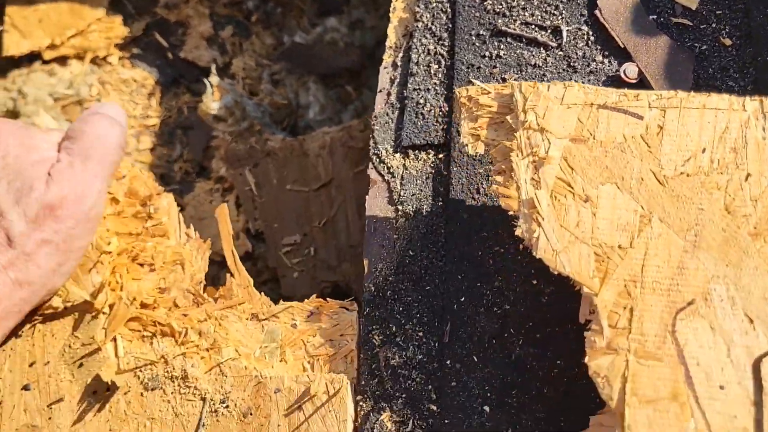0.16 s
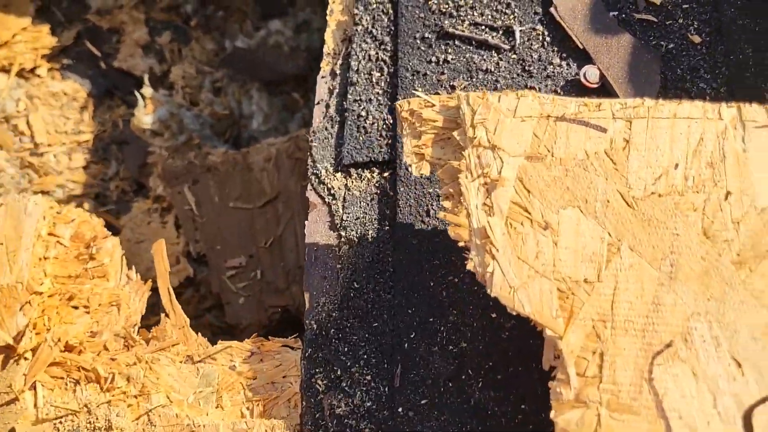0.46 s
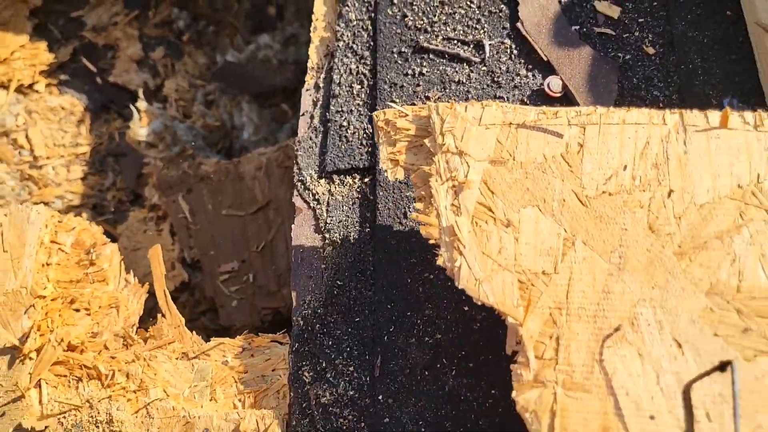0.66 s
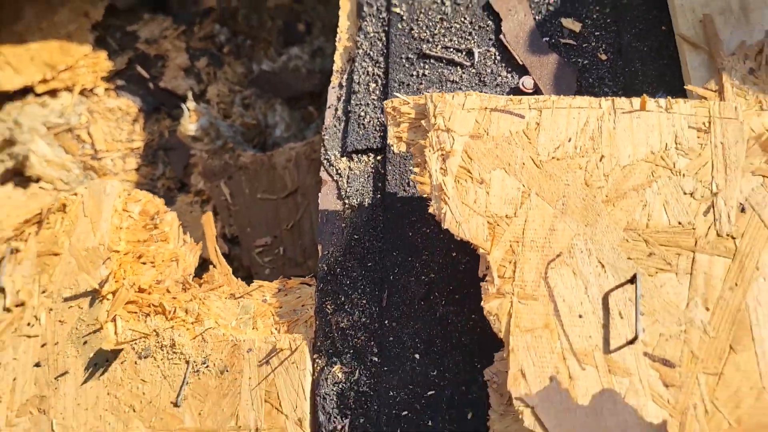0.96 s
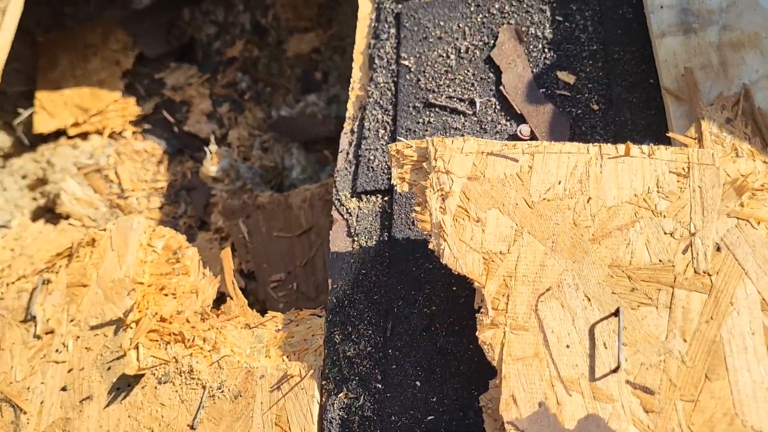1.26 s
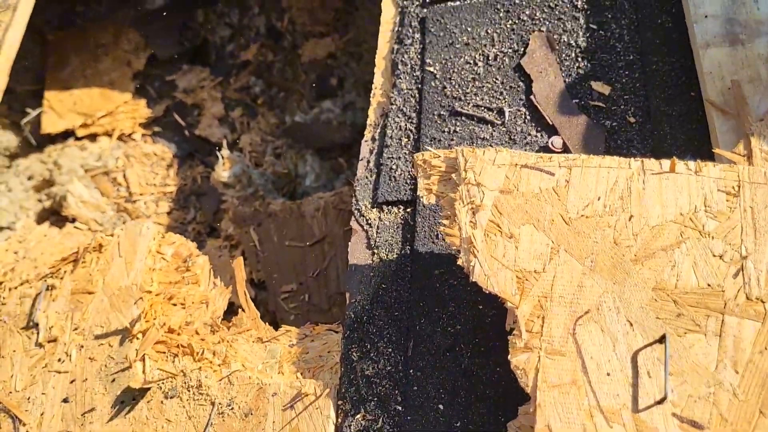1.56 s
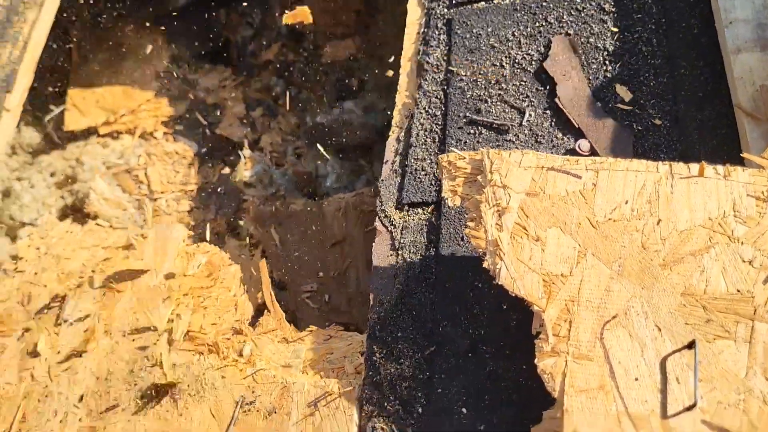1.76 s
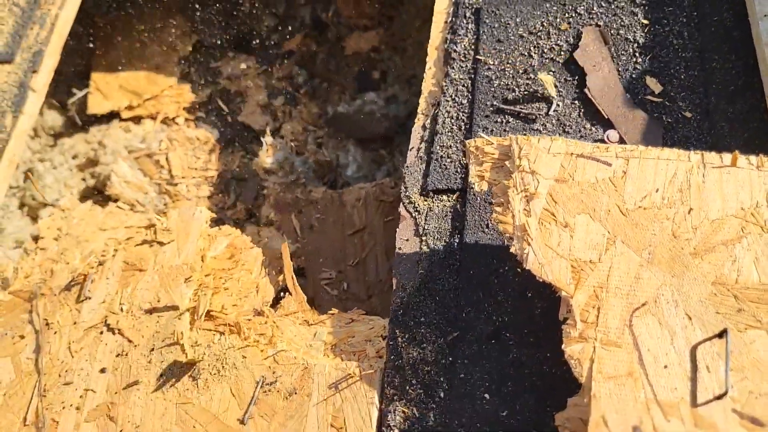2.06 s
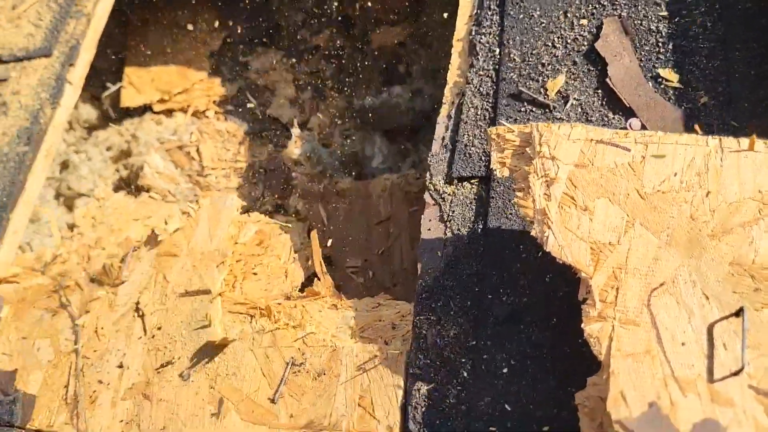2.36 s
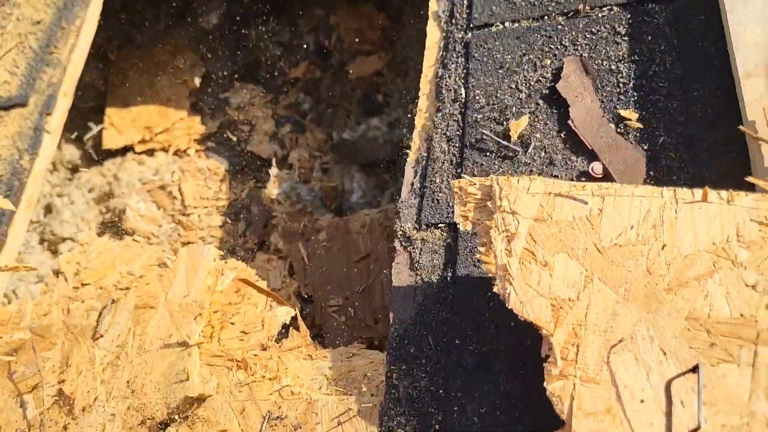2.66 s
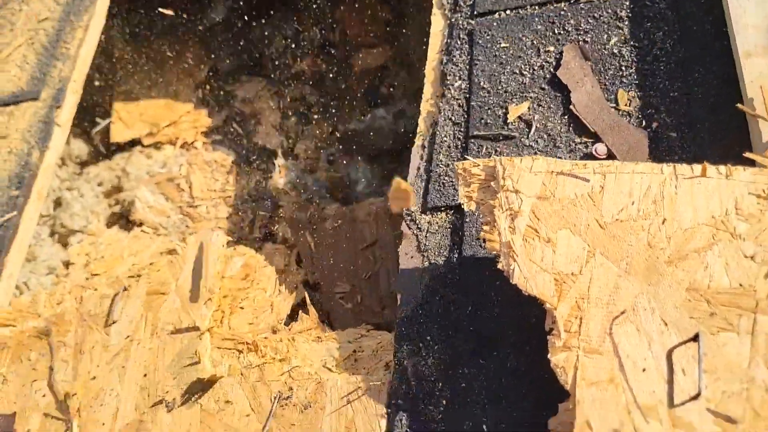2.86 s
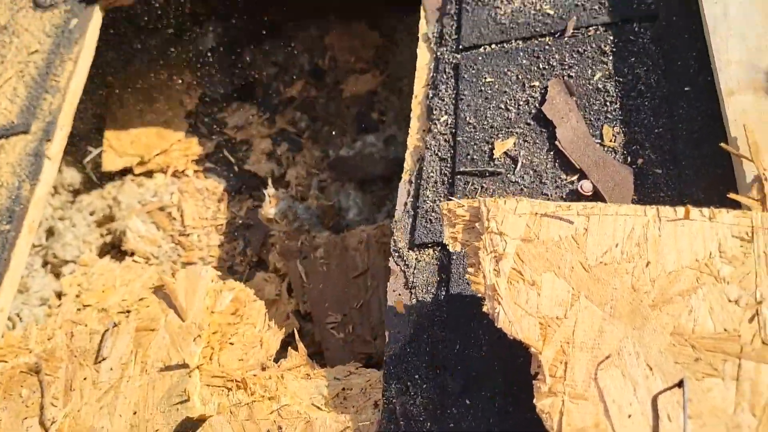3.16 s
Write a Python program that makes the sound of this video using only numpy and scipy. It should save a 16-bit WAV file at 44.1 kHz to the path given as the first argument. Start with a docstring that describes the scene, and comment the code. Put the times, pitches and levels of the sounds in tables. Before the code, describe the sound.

Close stereo pickup outdoors on a roof: splintering board fibres crackle and snap over soft low thumps and wind, then four hard, evenly spaced hammer knocks ring the hollow deck, chips pattering after.

```python
"""A hammer lands four times on a strand-board roof deck: short crack, low flex, bounces, a patter of chips.
Before it a cut piece of board is pried loose: it crunches (grains), snaps (short rings) and thuds (low pushes).
The blows are noise bursts ringing board modes, with a swelling low wave.
Wind mutters at two microphone ports over a thin outdoor hiss; both are coloured noise."""
import sys
import numpy as np
from scipy import signal
from scipy.fft import rfft, irfft
from scipy.io import wavfile
from scipy.ndimage import uniform_filter1d

SR = 44100
rng = np.random.default_rng(int(sys.argv[2]) if len(sys.argv) > 2 else 0)


def put_to_file(sound):
    """Save the sound as 16-bit audio at rate SR, in the file named by the first command-line argument."""
    columns = np.atleast_2d(sound).T  # one column per channel
    safe = np.clip(columns, -1, 1)
    whole_steps = np.round(safe * 32767)
    wavfile.write(sys.argv[1], SR, whole_steps.astype(np.int16))


def magnitude_from_level(level_db):
    """Linear magnitude for a level in decibels (20 dB per decade)."""
    exponent = np.asarray(level_db, float) / 20
    return 10 ** exponent


N = 145530
LEFT_DB, LAG_SAMPLES = -1.0, 8  # right port: opposite gain, usual lag

# hammer blows: full_contact_s, crack_db, flex_db, right_lag_samples
BLOWS = [(1.6328, 3, -3, 10), (2.1164, 4, -4.5, 10), (2.665, 3, -4.5, 10.5), (3.274, 3.5, -3.5, -7.5)]


def evened(x):
    """Scale to rms 1."""
    return x / np.sqrt(np.mean(x ** 2) + 1e-20)


def spectrum_db(points, hz):
    """Gain table read on a log-frequency axis."""
    f, gain_db = np.transpose(points)
    return np.interp(np.log(hz + 1), np.log(f + 1), gain_db, left=-90, right=-90)


def level_curve(rows):
    """Amplitude over time from (s, dB) points, straight lines in dB."""
    time_s, level_db = np.transpose(rows)
    return magnitude_from_level(np.interp(np.arange(N) / SR, time_s, level_db))


def coloured(x, points):
    """Causal (minimum-phase) filter with the given spectrum."""
    hz = abs(np.fft.fftfreq(8192, 1 / SR))
    log_gain = np.log(magnitude_from_level(spectrum_db(points, hz)))
    min_phase = signal.hilbert(log_gain).imag
    taps = np.fft.ifft(np.exp(log_gain - 1j * min_phase)).real[:4096]
    return signal.oaconvolve(x, taps[None], axes=1)[:, :x.shape[1]]


def dying_sine(hz, t60_s, t):
    """One decaying mode."""
    return magnitude_from_level(-60 * t / t60_s) * np.sin(2 * np.pi * hz * t)


def ring(modes, t, detune=1):
    """Sum of decaying modes (Hz, dB, t60 s), each frequency times its detune."""
    ratios = detune * np.ones(len(modes))
    return sum(magnitude_from_level(db) * dying_sine(hz * d, t60_s, t) for (hz, db, t60_s), d in zip(modes, ratios))


def butter(x, order, hz, kind):
    """Butterworth filter."""
    return signal.lfilter(*signal.butter(order, hz, kind, fs=SR), x)


def add(mix, start_s, sound, lag_samples):
    """Place a sound at both ports; nearby edges scatter the treble differently to each."""
    scatter_hz, scatter_t60_s, scatter_db = 2750, 0.003, -7.0
    cycles_per_sample, t = np.fft.rfftfreq(len(sound)), np.arange(512) / SR
    edges = rng.standard_normal((2, len(t))) * magnitude_from_level(-60 * t / scatter_t60_s)
    edges = butter(edges, 1, scatter_hz, "high")
    edges /= np.linalg.norm(edges, axis=1, keepdims=True)
    paths = 1 + magnitude_from_level(scatter_db) * rfft(edges, len(sound))
    paths[0] *= magnitude_from_level(LEFT_DB)
    paths[1] *= np.exp(-2j * np.pi * cycles_per_sample * lag_samples) / magnitude_from_level(LEFT_DB)
    for ch, v in enumerate(irfft(rfft(sound) * paths, len(sound))):
        part = mix[ch, max(round(start_s * SR), 0):][:len(v)]
        part += v[:len(part)]


def noise_pair(correlation):
    """Two noises with a given correlation."""
    a, b = rng.standard_normal((2, N))
    return np.array([a, correlation * a + np.sqrt(1 - correlation ** 2) * b])


def grains(per_s, spread_db):
    """Random clicks of very uneven size from four places around the two ports."""
    lags = (LAG_SAMPLES, LAG_SAMPLES // 2, -LAG_SAMPLES // 2, LAG_SAMPLES + 3)
    size = magnitude_from_level(spread_db * np.minimum(rng.exponential(1, (4, N)), 5))
    size *= rng.choice([-1, 1], (4, N))
    size *= rng.random((4, N)) < per_s / SR / 4
    right = sum(np.roll(v, lag) for v, lag in zip(size, lags))
    return np.array([magnitude_from_level(LEFT_DB) * size.sum(0), right / magnitude_from_level(LEFT_DB)])


def fibres(per_s, spread_db, lo_hz, hi_hz, clumps=1):
    """Grains of ten fibre sizes: a wide tick plus a few cycles at the fibre's own pitch."""
    t, out = np.arange(512) / SR, 0
    for hz in np.geomspace(lo_hz, hi_hz, 10):
        tone = dying_sine(hz, 6 / hz, t)  # 60 dB down in 6 cycles
        grain = tone / np.linalg.norm(tone) + 0.5 * (t == 0)
        clicks = clumps * grains(per_s / 10, spread_db)
        out = out + signal.oaconvolve(clicks, grain[None], axes=1)[:, :N]
    return out


def crunch():
    """Tearing fibres: spells of bright and dull grains, in clumps."""
    # tearing spells: start_s, length_s, level_db, bright_share_db
    spells = [(0, 0.021, -39.5, -5.5), (0.052, .045, -50, 6.5), (0.114, 0.043, -32, -1.5),
              (0.197, 0.056, -36, -.5), (0.29, 0.01, -37, 2), (0.339, 0.038, -40.5, -3),
              (0.411, 0.015, -35.5, -6.5), (0.523, 0.0047, -32, 2.5), (0.58, 0.077, -40, -1.5),
              (0.639, 0.097, -42.5, -0.5), (0.741, 0.08, -44, -8), (0.838, 0.06, -32, -6.5),
              (0.902, 0.089, -41, -1), (0.953, 0.057, -39.5, -14), (1.024, 0.037, -32, -7.5),
              (1.312, 0.023, -48.5, -2), (2.198, 0.0091, -50.5, -0.5), (2.569, 0.034, -54, -1)]
    # grain colours: hz, gain_db
    bright_colour = [(1470, -23), (2500, 8.5), (2730, -10.5), (4810, 4.5), (5510, 9), (14800, -3),
                     (16100, -2), (16500, -49)]
    dull_colour = [(180, -32), (300, -4.5), (540, -13.5), (751, -13), (1100, -12), (1750, -2), (2500, -6.5),
                   (4200, -9.5), (6500, -31), (11000, -120)]
    per_s, spread_db, edge_s, clumps_db = 8000.0, 4.0, 0.006, 4.0
    t, bright_level, dull_level = np.arange(N) / SR, np.zeros(N), np.zeros(N)
    for start_s, length_s, level_db, bright_db in spells:
        attack = np.clip((t - start_s) / edge_s, 0, 1)
        release = np.exp(-np.maximum(t - start_s - length_s, 0) / edge_s)
        spell = magnitude_from_level(level_db) * attack * release
        share = min(magnitude_from_level(bright_db), 0.99)
        bright_level += share * spell
        dull_level += np.sqrt(1 - share ** 2) * spell
    clumps = magnitude_from_level(clumps_db * evened(uniform_filter1d(rng.standard_normal(N), size=150)))
    bright = fibres(per_s, spread_db, 3000.0, 15000.0, clumps)
    dull = fibres(per_s, spread_db, 700.0, 4500.0, clumps)
    bright = evened(coloured(bright, bright_colour))
    dull = evened(coloured(dull, dull_colour))
    return bright_level * bright + dull_level * dull


def air_lumps():
    """Slow random swell, rms 1, shared by wind and hiss."""
    once = uniform_filter1d(rng.standard_normal(N), size=900)
    return evened(uniform_filter1d(once, size=900))


def wind(lumps):
    """Lumpy low rumble at the ports, with buffeting above it in sharper bumps."""
    # gusts: time_s, level_db
    gusts = [(0, -29), (.2, -41.5), (.65, -31.5), (.8, -41), (1., -29), (1.12, -42), (1.3, -28),
             (1.35, -37.5), (1.45, -24), (1.55, -38), (1.75, -46.5), (1.85, -42), (1.94, -53.5),
             (2.05, -42), (2.25, -44.5), (2.35, -44.5), (2.48, -71), (2.56, -56), (2.64, -70),
             (2.85, -41.5), (2.95, -50), (3.05, -38), (3.12, -56.5), (3.2, -51)]
    # rumble spectrum: hz, gain_db
    colour = [(12, -41.5), (20, -11), (48, -1.5), (92, -2.5), (156, -13), (222, -18), (330, -26),
              (743, -47), (900, -50), (1170, -86.5), (1980, -120)]
    correlation, lumps_db, buffet_db, buffet_lumps_db = 0.26, 4, -23.5, 6
    rumble = evened(coloured(noise_pair(correlation) * magnitude_from_level(lumps_db * lumps), colour))
    buffet = noise_pair(correlation) * magnitude_from_level(buffet_lumps_db * lumps)
    buffet = evened(butter(buffet, 2, [170.0, 480.0], "band"))
    return level_curve(gusts) * (rumble + magnitude_from_level(buffet_db) * buffet)


def hiss(lumps):
    """Thin, gritty outdoor hiss: noise with fast and slow level flutter."""
    # hiss level, lower after the first blow: time_s, level_db
    levels = [(0, -43.5), (.5, -52.5), (1.1, -51.5), (1.6, -55.5), (1.77, -50.5), (1.8, -68), (2.1, -64),
              (2.3, -67.5), (2.65, -69), (3.03, -66), (3.06, -70), (3.3, -71)]
    # hiss spectrum: hz, gain_db
    colour = [(200, -34), (300, -12.5), (600, -11.5), (1200, -18), (1800, -12.5), (3500, -17.5),
              (6800, -16.5), (7900, -10.5), (8600, -14.5), (9000, -22), (15300, -20.5), (16200, -48.5)]
    correlation, grit_db = 0.19, 2.5
    fast = evened(uniform_filter1d(rng.standard_normal(N), size=120))
    grit = magnitude_from_level(grit_db * fast + lumps)
    return level_curve(levels) * evened(coloured(noise_pair(correlation) * grit, colour))


def thuds():
    """The piece rocks on the deck: soft low pushes under a swell-and-fade envelope."""
    # pushes: start_s, envelope_peak_db, pitch_hz, rise_s (at least 0.003 used)
    pushes = [(0.004, -28, 78, 0.0023), (0.516, -17, 87, 0.0068), (0.607, -23, 89, 0.0028),
              (1.008, -17.5, 87, 0.0048), (1.051, -13.5, 99, 0.0023), (1.254, -30, 79.6, 0.015),
              (1.371, -14, 80.5, 0.0023), (1.402, -18, 81, 0.00088), (1.455, -15.5, 77, 0.0074)]
    out, t = np.zeros((2, N)), np.arange(8192) / SR
    for start_s, peak_db, hz, rise_s in pushes:
        u = t / max(rise_s, 0.003)
        push = u * np.exp(1 - u) * np.sin(2 * np.pi * hz * t)
        add(out, start_s, -magnitude_from_level(peak_db) * push, LAG_SAMPLES)
    return out


def splinters():
    """Snaps: a sharp wide edge with a little fizz excites one short ring."""
    # snaps: start_s, peak_db, ring_hz, edge_share_db
    snaps = [(0.02, -17, 1800, 10), (0.066, -22.5, 2320, -17), (0.0971, -17.5, 6850, -26),
             (0.1015, -12, 1870, -16), (0.103, -20.5, 667, -30), (0.1275, -16, 8700, -15),
             (0.143, -13, 8550, -12), (0.1553, -12.5, 4330, 17), (0.1352, -18, 8900, -14),
             (0.187, -28, 6100, -16), (0.201, -14, 6960, -3), (0.204, -18, 6060, 5),
             (0.2078, -15.5, 7700, -6), (0.219, -20, 6100, -22), (0.2554, -8, 5100, -2.5),
             (0.299, -17, 4700, -3), (0.326, -26, 7560, -22), (0.3562, -29, 796, 1),
             (0.4178, -20.5, 970, -31), (0.4722, -25, 6370, -1), (0.5015, -11.5, 3540, -1),
             (0.5456, -9.5, 2420, -10), (0.5826, -21, 5710, 10), (0.618, -14.5, 1190, 16),
             (0.6366, -17, 1870, 4), (0.6494, -20.5, 4660, -7), (0.673, -17, 4170, 27),
             (0.7007, -19, 1870, 0.5), (0.7104, -16, 1730, 8.5), (0.7205, -16.5, 1880, 7.5),
             (0.7664, -26, 1800, 7), (0.7822, -18, 1650, 7), (0.8329, -19.5, 1910, -1.5),
             (0.844, -20, 1490, 13), (0.937, -16.5, 4470, 8), (0.962, -18.5, 4580, -6),
             (0.9802, -14, 4900, -1), (1.0307, -22, 3850, 3), (1.051, -12, 3450, -13),
             (1.2097, -36, 1260, 1.5), (1.416, -40, 5140, -1), (1.464, -31.5, 940, 28),
             (1.499, -23.5, 1170, 18), (1.5426, -15, 5760, -6), (1.5534, -20.5, 6060, -12),
             (1.554, -15.5, 2060, -26), (1.6166, -34, 4630, 2), (1.6275, -18.5, 925, -11),
             (2.0252, -36, 5900, -1), (2.0364, -36.5, 1800, 13), (2.3022, -40, 7700, -5),
             (2.4177, -35.5, 4500, 3.5), (2.6014, -36.5, 1620, -3.5), (3.046, -42, 910, 16),
             (3.146, -37, 6300, 6), (3.164, -38, 6000, -4), (3.1765, -37, 1905, -2), (3.186, -36, 1944, 13),
             (3.2105, -39.5, 1970, 3)]
    fizz_t60_s, ring_cycles, fizz = 0.012, 8.0, 0.14  # ring is 60 dB down after ring_cycles
    out, t = np.zeros((2, N)), np.arange(4096) / SR
    for start_s, peak_db, hz, edge_db in snaps:
        tick = fizz * rng.standard_normal(len(t)) * magnitude_from_level(-60 * t / fizz_t60_s) + (t == 0)
        body = signal.fftconvolve(tick, dying_sine(hz, ring_cycles / hz, t))[:len(t)]
        body = butter(body, 2, hz / 2, "high")
        edge = butter(tick, 2, [1200.0, 14000.0], "band")
        snap = body / abs(body).max() + magnitude_from_level(edge_db) * edge / abs(edge).max()
        add(out, start_s, magnitude_from_level(peak_db) * snap / abs(snap).max(), LAG_SAMPLES)
    return out


def crack(peak_db, top_hz, lead_s):
    """A faint noise swell just before the crack, then a noise burst rings the board and hammer head."""
    # board modes: centre_hz, level_db, t60_s
    board_modes = [(678, -2.5, 0.039), (809, -1, 0.023), (1115, -9, 0.015), (1338, -4.5, 0.035),
                   (1590, -5, 0.016), (2047, 9, 0.02), (2667, -0.5, 0.025), (3148, -4, 0.0071),
                   (4830, 0, 0.0053), (5400, -5.5, 0.0035), (7880, -4, 0.0031)]
    lead_db, hold_s, rise_s, burst_t60_s = -10.5, 0.002, 0.0003, 0.019
    mode_spread, burst_db, unfiltered_db = 0.045, -24, -12.0
    head_mode = (4400, -44, 0.18)  # centre_hz, level_db, t60_s
    t = np.arange(16384) / SR
    u = np.maximum(t - lead_s, 0)
    lead_in = magnitude_from_level(lead_db) * (t < lead_s) * t / lead_s
    decay = magnitude_from_level(-60 * np.maximum(u - hold_s, 0) / burst_t60_s)
    burst = rng.standard_normal(len(t)) * (lead_in + decay * (1 - np.exp(-u / rise_s)))
    burst[round(lead_s * SR)] -= 11  # full contact
    clusters = board_modes * 3  # each mode is a close cluster of three
    detune = 1 + mode_spread * rng.uniform(-1, 1, len(clusters))
    board = signal.fftconvolve(burst, ring(clusters, t, detune))[:len(t)]
    board = butter(board, 3, 500.0, "high")  # keeps the crack free of bass; the flex carries the lows
    head = ring([head_mode] * 3, u, rng.uniform(0.985, 1.015, 3))
    sound = board / abs(board).max() + magnitude_from_level(burst_db) * burst + head
    sound = butter(sound, 2, top_hz, "low") + magnitude_from_level(unfiltered_db) * sound
    return magnitude_from_level(peak_db) * sound / abs(sound).max()


def flex(level_db, delay_s):
    """The deck's bending wave swells in after the crack and hums on in its low modes."""
    # deck modes: pitch_hz, level_db, t60_s
    deck_modes = [(59.5, -28.5, 0.44), (97, -13.5, 0.08), (136, -14, 0.17), (213, -33.5, 0.04),
                  (332, -30.5, 0.21)]
    width_s, flex_hz, overtone_db = 0.005, 94.8, -14.5
    ripple_lead_s, ripple_mode = 0.0075, (520.0, -3.5, 0.0083)  # mode: hz, level_db, t60_s
    u = np.arange(16384) / SR - delay_s
    bell = np.exp(-0.5 * (u / width_s) ** 2)
    wave = np.cos(2 * np.pi * flex_hz * u) + magnitude_from_level(overtone_db) * np.cos(4 * np.pi * flex_hz * u)
    # faster, shorter bending waves run ahead of the flex
    ahead = u + ripple_lead_s
    ripple = (ahead > 0) * ring([ripple_mode], np.maximum(ahead, 0))
    hum = ring(deck_modes, np.maximum(u + 0.25 / flex_hz, 0)) * (u > 0)
    return magnitude_from_level(level_db) * (bell * wave - ripple + (1 - bell) * hum)


def hammer():
    """Blows and duller rebounds, each a crack plus a delayed flex."""
    # rebounds: full_contact_s, crack_db, flex_db, right_lag_samples
    bounces = [(1.672, -10, -13, 9.8), (2.153, -11, -14, 10.9), (2.727, -15.5, -21, 11.7)]
    lead_s = 0.004  # lead-in to full contact
    out = np.zeros((2, N))
    for rows, top_hz, flex_delay_s in ((BLOWS, 20000.0, 0.0155), (bounces, 1530, 0.0163)):
        for contact_s, crack_db, flex_db, lag_samples in rows:
            add(out, contact_s - lead_s, crack(crack_db, top_hz, lead_s), lag_samples)
            add(out, contact_s, flex(flex_db, flex_delay_s), lag_samples)
    return out


def chips():
    """Chips patter down after each blow: grains under a fast and a slow decay."""
    # patter colour: hz, gain_db
    colour = [(120, -37), (200, -11.5), (627, -19.5), (941, -31.5), (2040, -26.5), (3240, -35),
              (4270, -25.5), (15200, -40), (16400, -56.5)]
    level_db, t60_s, late_db, late_t60_s = -22, 0.18, -29, 0.96  # late_db relative to the fast part
    per_s, spread_db = 9000.0, 3.0
    t, fall = np.arange(N) / SR, np.zeros(N)
    for contact_s, *_ in BLOWS:
        u = np.maximum(t - contact_s, 0)
        fall += (t > contact_s) * (magnitude_from_level(-60 * u / t60_s) + magnitude_from_level(late_db - 60 * u / late_t60_s))
    patter = evened(coloured(fibres(per_s, spread_db, 860.0, 11000.0), colour))
    return magnitude_from_level(level_db) * fall * patter


def scene():
    """All sources at the two ports."""
    lumps = air_lumps()
    return crunch() + wind(lumps) + hiss(lumps) + thuds() + splinters() + hammer() + chips()


def roll_off(x):
    """The treble ends steeply here."""
    return signal.sosfilt(signal.butter(12, 16850, fs=SR, output="sos"), x)


def record(dry):
    """Band limit at 16 kHz, then peaks above the knee rounded off towards full scale."""
    knee, ceiling = 0.85, 1.0
    low_pass = signal.firwin(255, 16000, window=("kaiser", 7), fs=SR)
    limited = signal.oaconvolve(dry, low_pass[None], "same")
    over, room = np.maximum(abs(limited) - knee, 0), ceiling - knee
    mix = limited - np.sign(limited) * (over - room * np.tanh(over / room))
    return roll_off(mix)


dry = scene()
out = record(dry)
put_to_file(out)
```